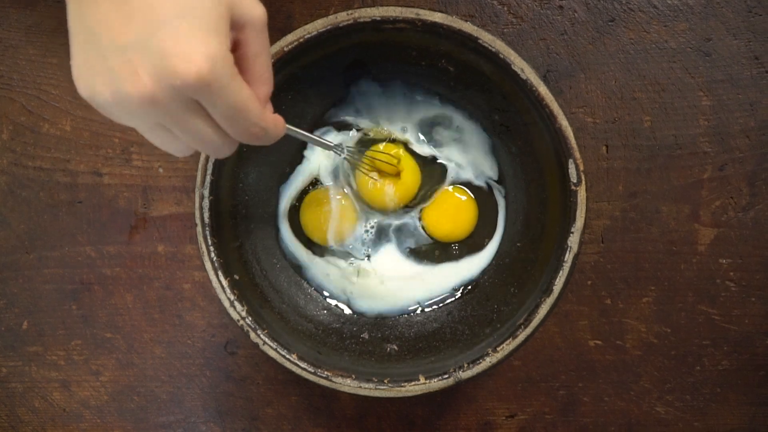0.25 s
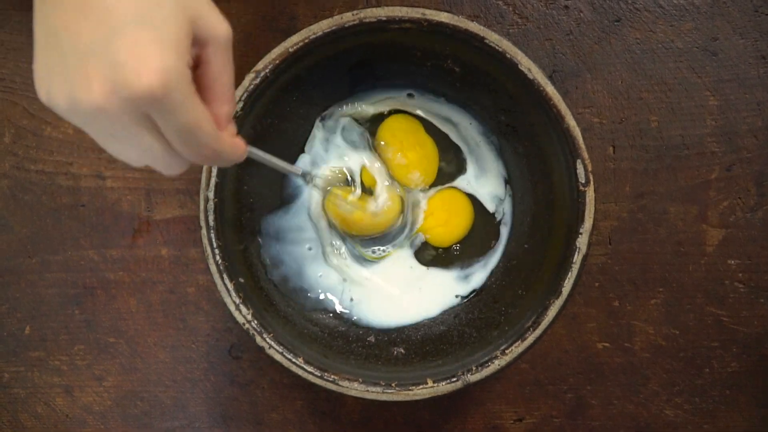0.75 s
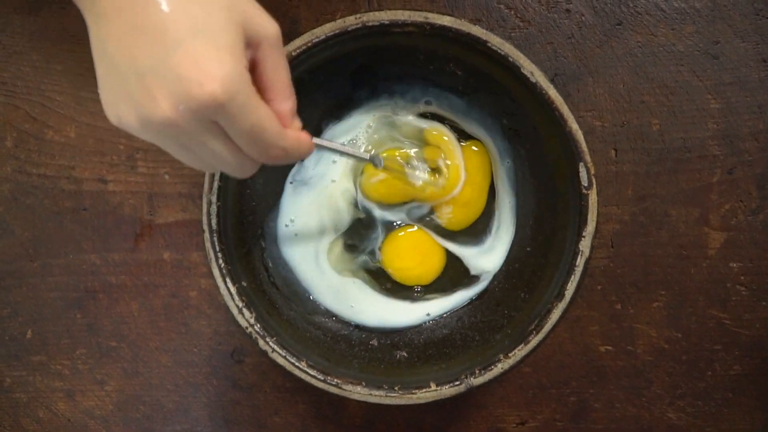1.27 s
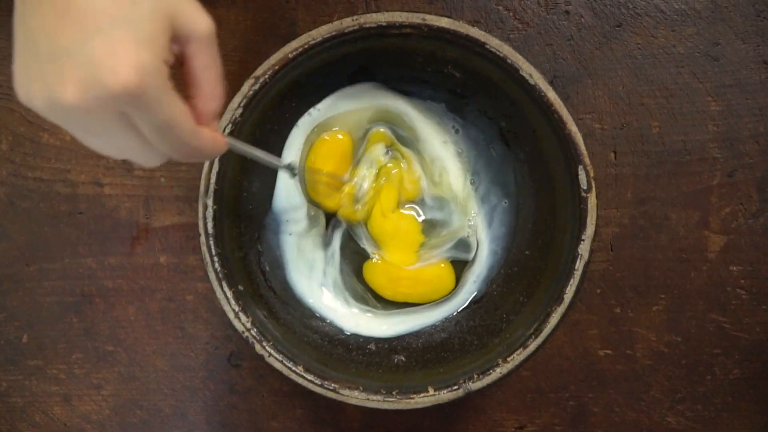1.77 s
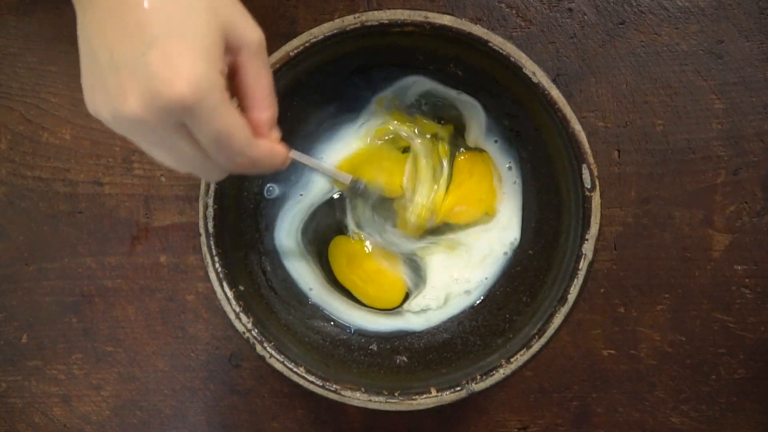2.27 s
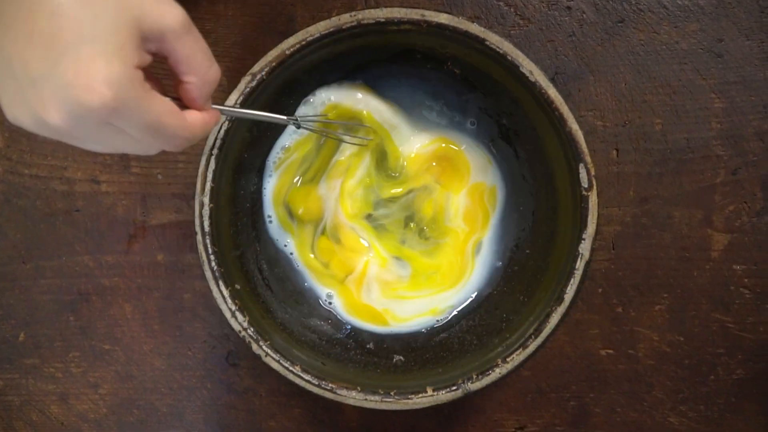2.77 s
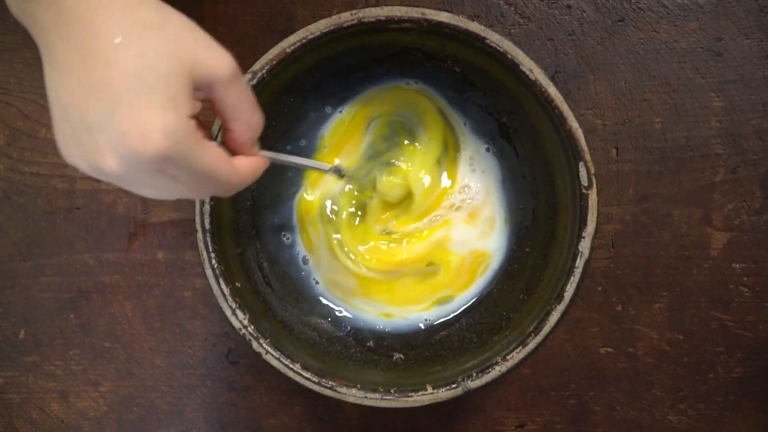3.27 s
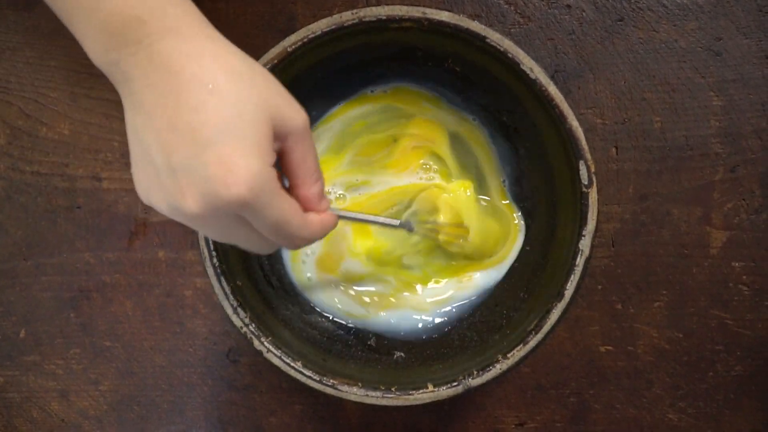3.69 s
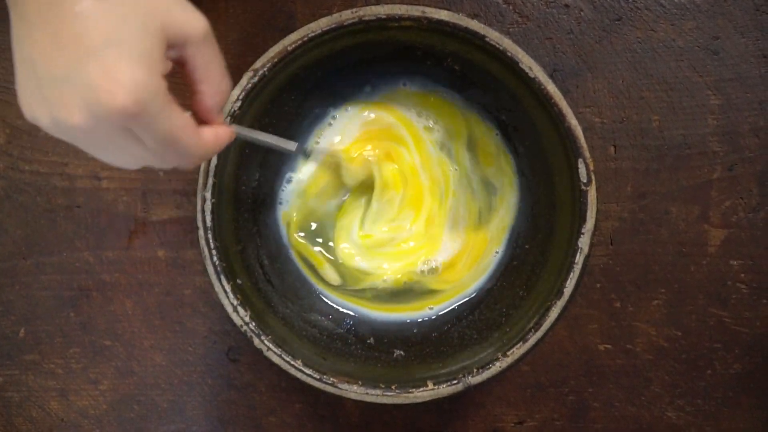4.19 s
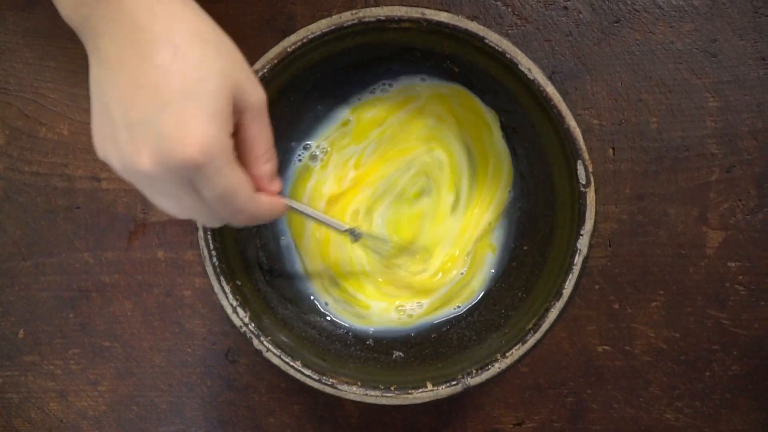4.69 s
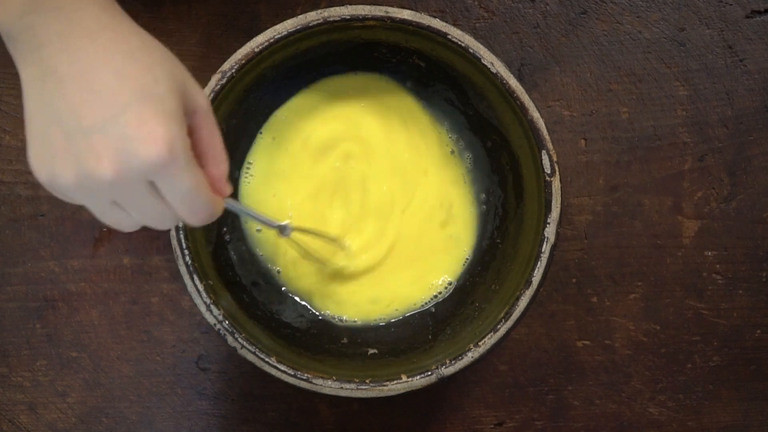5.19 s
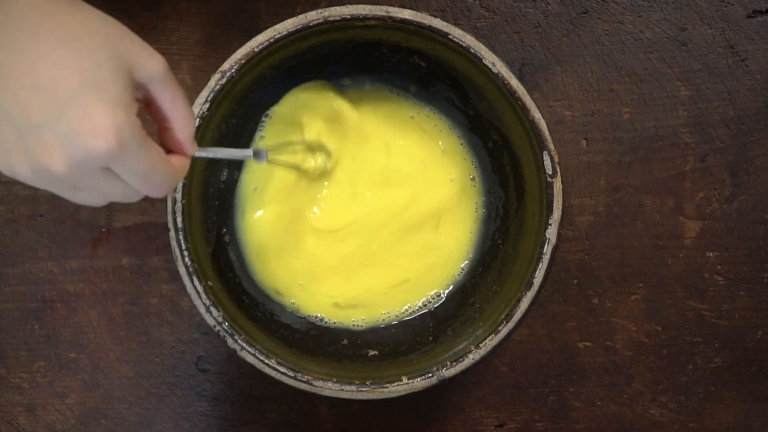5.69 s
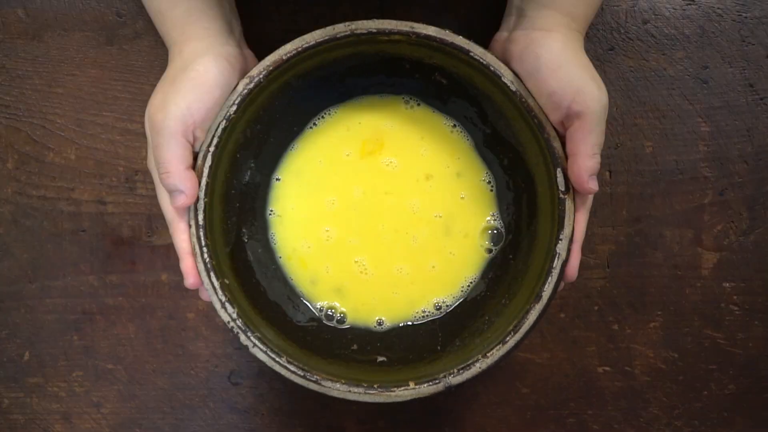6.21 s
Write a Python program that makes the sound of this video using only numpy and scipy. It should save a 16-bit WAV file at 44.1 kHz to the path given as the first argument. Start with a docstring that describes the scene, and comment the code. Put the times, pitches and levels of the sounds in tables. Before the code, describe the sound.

A small wire whisk beats eggs and milk in a ceramic bowl, close to the microphone. From the start, short, bright scrapes come unevenly, about five to seven a second, as the wires skid over the glaze. Each has a thin, quickly fading metallic ring and a damped tone from the bowl. Sharp little ticks fall among them where a wire taps the wall. The strokes are lighter and more spaced at first, then stronger and busier from about 2 seconds, with the sharpest clicks between 3.3 and 4.8 seconds. The egg gives two small wet plops at about 3.8 and 4 seconds. At 4.9 seconds the sound breaks off and goes straight on, duller and deeper in the blended egg, with a few taps and sparser strokes until about 6.1 seconds. The small kitchen adds a brief echo, and a faint, steady low hum runs underneath throughout.

```python
"""In a small kitchen, a wire whisk beats eggs and milk in a ceramic bowl on a wooden table, close by.
On each turn the wires skid over the glaze, and tiny slips ring the wire loops and the egg-damped bowl.
Now and then a wire just taps the wall, or the egg slaps. Near the end the sound breaks off and goes on
duller, with the egg well blended. The room echoes briefly over a low, steady background."""
import sys
import numpy as np
from scipy import signal
from scipy.fft import rfft, irfft
from scipy.io import wavfile

SR = 44100
rng = np.random.default_rng(int(sys.argv[2]) if len(sys.argv) > 2 else 0)


def generate_wav(sig):
    """Save sig (samples, or channels by samples) to the path in sys.argv[1] as 16-bit PCM at SR."""
    pcm = np.round(np.clip(np.atleast_2d(sig).T, -1, 1) * 32767).astype(np.int16)
    wavfile.write(sys.argv[1], SR, pcm)


N = 284438
SIZE = 8192  # samples in one skid, tap or slap
FREQ = np.maximum(np.arange(SIZE // 2 + 1) * SR / SIZE, 1)
TIME = np.arange(SIZE) / SR
BREAK_S = 4.892  # the echo stops dead here; later skids are in blended egg

# The whisk's skids. Each row: start in seconds, length in seconds, hardest point (0-1 of the length),
# strength in dB, then the wires' low ring and high ring in dB above that strength.
SKIDS = [(0.138, 0.061, 0, -35, 4.5, 6), (0.215, .036, 0.38, -30.5, 4, 6),
         (0.265, 0.034, 0.74, -31.5, -0.5, -2.5), (0.413, 0.011, 0, -49.5, 10.5, -8),
         (0.688, 0.087, 0.69, -28, -3.5, -3.5), (0.876, 0.035, 0.46, -30.5, 2.5, -3),
         (1.217, .032, 0.53, -34, 6, -3), (1.567, 0.081, 0.49, -27, 7, 2.5),
         (1.888, 0.016, 0.3, -38.5, -7, -20), (1.932, 0.024, .4, -28.5, -30, -5.5),
         (2.06, 0.041, 0.66, -28.5, -4, 3.5), (2.2065, 0.026, .85, -24, 3, 4.5),
         (2.376, 0.021, 0, -23, 5, -1.5), (2.533, 0.022, 0.45, -23.5, -1, 0.5),
         (2.772, 0.049, 0.18, -29, -0.5, 0.5), (2.934, 0.067, 0.43, -26.5, -12, -3),
         (3.114, 0.092, 0.57, -24, -6.5, 2), (3.312, 0.034, 1, -25, 4.5, 3),
         (3.348, 0.041, 0.17, -32.5, 3, 8.5), (3.485, 0.045, 0.27, -24, 8, 5),
         (3.542, .04, 0.03, -30, -0.5, 2), (3.655, 0.078, 0.55, -31, 0, 2),
         (3.748, 0.023, 0.7, -37.5, -6, -10.5), (3.791, 0.044, 0, -24, -14.5, -4),
         (3.834, 0.055, 0.8, -26.5, 0.5, 9), (3.998, 0.072, .82, -27.5, 5.5, 6),
         (4.211, 0.016, 0.7, -31, -.5, -2), (4.400, .023, .65, -26.5, 5.5, -1),
         (4.582, 0.0083, 0.2, -27.5, 0.5, 10), (4.598, 0.026, 0.86, -26, 3, -2),
         (4.683, .011, 0.7, -37, 3.5, 5.5), (4.791, .048, 0.43, -20.5, 5.5, 2),
         (4.84, 0.051, 0.2, -31.5, 1.5, -1.5), (4.98, .03, .1, -25, -0.5, 2),
         (5.158, 0.021, 0, -30, 5.5, 7), (5.337, 0.031, .5, -30.5, 3, 2), (5.523, 0.034, 0.05, -31, 2, 2.5),
         (5.711, 0.021, 0.3, -37.5, -14.5, -17), (6.053, .028, 0.65, -28.5, 6, -1.5)]
# The pitch wanders with the part of the loop that touches. Each row: time in seconds, low ring in Hz.
WIRE_PITCH = [(0.14, 2697), (0.6, 2613), (1.5, 2618), (2.4, 2563), (3.2, 2630), (3.52, 2718), (4.1, 2604),
              (4.8, 2714), (5.0, 2520), (6.05, 2527)]
# How loud the bowl is under a 0 dB skid. Each row: time in seconds, level in dB.
BOWL_LEVEL = [(0.3, -29.5), (0.7, -19.5), (1.3, -25), (2.3, -20.5), (2.55, -25), (3.8, -18.5), (4.6, -25),
              (5.5, -16), (6.05, -21)]
def skids():
    """Each skid over the glaze rings the bowl and the wires and makes a bright rasp."""
    out = np.zeros(N)
    usual_db, usual_hz = np.mean(SKIDS, axis=0)[3], np.mean(WIRE_PITCH, axis=0)[1]
    for start, length, hardest, db, low_db, high_db in SKIDS:
        # blended egg clings to wires and wall, so the sound is duller and deeper
        upper_bowl_db, bend_lift_db, high_lift_db = (-8, 7.5, -4.5) if start > BREAK_S else (0, 0, 0)
        (low_hz,), (bowl_db,) = read(WIRE_PITCH, start), read(BOWL_LEVEL, start)
        high_hz = 3794 * (low_hz / usual_hz) ** 0.38  # the high ring wanders less
        force = slips(length, hardest * length)
        singing = force * (1 - np.exp(-TIME / 0.001196))  # wires slide a moment before they sing
        bowl = bowl_ring(force, upper_bowl_db)
        bend = loop_bend(force)
        low = sliding(singing, length, 0.016,
                      lambda: wire_ring(low_hz, width_hz=129, split_hz=92, skirt_hz=1200))
        high = sliding(singing, length, 0.018,
                       lambda: wire_ring(high_hz, width_hz=228, split_hz=180, skirt_hz=1500))
        bright = rasp(force, length, top_db=-0.14 + 0.15 * (db - usual_db))  # harder is brighter
        layers = [(bowl, bowl_db + 0.48 * db), (bend, db + low_db - 15.5 + bend_lift_db),
                  (low, db + low_db), (high, db + high_db + high_lift_db), (bright, db)]
        for spectrum, layer_db in layers:
            add(out, start, level(irfft(spectrum), layer_db, length))
    return out


# A quick flick slaps on and off; a long sweep eases in and out. Each row: skid length in seconds,
# then pressure at landing and at lifting in dB, compared with the hardest point.
PRESSURE = [(.028, -3, -5.5), (.048, -13, -12.5)]
def slips(length, hardest_s, per_second=7000, chatter_hz=304.0, release_s=0.0028):
    """The force of a skid: many tiny, unequal slips that swell with the pressure as the wires chatter."""
    land_db, lift_db = read(PRESSURE, length)
    hardest_s = np.clip(hardest_s, length / 20, length * 0.95)
    before = np.clip(1 - TIME / hardest_s, 0, 1)
    after = np.clip((TIME - hardest_s) / (length - hardest_s), 0, 1)
    pressure = undb(land_db * before ** 2 + lift_db * after ** 2)
    contact = np.exp(-np.maximum(TIME - length, 0) / release_s)
    chatter = np.interp(TIME * chatter_hz, np.arange(SIZE), rng.standard_normal(SIZE))
    kicks = (rng.random(SIZE) < per_second / SR) * rng.choice([-1, 1], SIZE)
    sizes = undb(2.5 * np.minimum(rng.exponential(size=SIZE), 4))
    knock = 1 + undb(9) * np.exp(-TIME / 0.0012)  # the wire lands with a knock
    return kicks * sizes * undb(1.5 * chatter) * pressure * contact * knock


def sliding(force, length, shift_s, body):
    """The contact slides along the wire, so every shift_s one shade of its tone fades into the next."""
    place = np.minimum(TIME, length) / shift_s
    shares = (np.cos(np.pi / 2 * np.minimum(np.abs(place - k), 1)) for k in range(int(place[-1]) + 2))
    return sum(rfft(force * share) * body() for share in shares)


def wire_ring(hz, width_hz, split_hz, skirt_hz):
    """The whisk's loops are nearly alike, so they ring as a cluster of close tones."""
    cluster = [(hz - split_hz, width_hz, -4), (hz, width_hz, 0), (hz + split_hz, width_hz, -4)]
    return modes(cluster, scatter_db=4.5, detune=0.011) * resonance(FREQ, hz, skirt_hz)


# The filled bowl's tones. Each row: pitch in Hz, width in Hz (wider dies sooner), relative level in dB.
BOWL_TONES = [(333.6, 61, -3.5), (368.7, 48, 0.5), (439, 39, -4), (540, 43, -5), (590.7, 36.3, 0.5),
              (727, 174, -8.5), (831, 254, -13), (1080, 88, -5), (1187, 89, -3.5), (1263, 85, -6.5)]
def bowl_ring(force, upper_db):
    """The slips shake the bowl and the egg damps it; upper_db turns its higher tones down."""
    ringing = modes(BOWL_TONES, scatter_db=2.0, detune=0.013) * resonance(FREQ, 616, 1400)
    upper = np.clip(np.log2(FREQ / 420), 0, 1)
    return rfft(force) * ringing * causal(undb(upper_db * upper))


# The tones of the bending loops. Each row: pitch in Hz, width in Hz, relative level in dB.
LOOP_TONES = [(1830, 92, -1), (1950, 93, -1), (2163, 110, -5.5)]
def loop_bend(force):
    """The wire loops bend and sound a little below their low ring."""
    return rfft(force) * modes(LOOP_TONES, scatter_db=0, detune=0.025) * resonance(FREQ, 1967, 460)


# The tone of steel on glaze, for skids and taps. Each row: frequency in Hz, relative level in dB.
RASP_COLOUR = [(200, -34.5), (500, -4), (1500, -10.5), (2200, -8.5), (3200, -5), (4500, -0.5), (5500, -1),
               (8000, 0), (9700, -3), (12000, -5), (14000, -8), (16000, -13)]
def rasp(force, length, top_db):
    """Sliding steel hisses on the glaze; top_db lifts or lowers the highest treble."""
    scraping = sliding(force, length, 0.018, lambda: steel(overtone_db=-1.5, echo_db=-1.5))
    top = np.clip(np.log2(FREQ / 7500) * 2, 0, 1)
    return scraping * causal(colour(FREQ, RASP_COLOUR)) * causal(undb(top_db * top))


# The wires' overtones. Each row: pitch in Hz, width in Hz, relative level in dB.
WIRE_OVERTONES = [(4990, 130, -13.5), (5485, 425, 10), (6423, 470, 5.5), (7740, 183, 10.5),
                  (8380, 136, 5.5), (8790, 380, 10), (10800, 290, 1.5), (11050, 87, 11), (12470, 330, 1.5),
                  (14000, 490, -12.5)]
def steel(overtone_db, echo_db):
    """Each point of contact favours some overtones, and the bowl's wall echoes it from close by."""
    ringing = modes(WIRE_OVERTONES, scatter_db=4, detune=0.009)
    delay_s = rng.uniform(0.0002, 0.0009)
    echo = np.exp(-2j * np.pi * FREQ * delay_s)
    return (1 + undb(overtone_db) * ringing) * (1 + undb(echo_db) * echo)


# Single taps: light ones tend to ring an overtone, hard ones the low ring. Each row: start in seconds,
# peak of the tick in dB, strength of the ring in dB above that, pitch of the ring in Hz.
WIRE_TAPS = [(0.213, -16, -12, 2600), (0.6905, -17, -18, 2605), (1.277, -26, -1, 5830),
             (1.510, -29.5, -4, 5000), (1.9024, -22, 5.5, 2470), (2.043, -31, 1, 6500),
             (2.4853, -24, -2, 6400), (2.926, -20.5, -7.5, 2580), (3.1031, -20.5, -7, 2600),
             (3.2884, -12.5, 3, 2700), (3.354, -16, -16, 2680), (3.4701, -10, -1.5, 2780),
             (3.7658, -21, -5.5, 8200), (4.399, -14.5, -12, 2550), (4.5833, -9, -2.5, 2710),
             (4.7714, -10.5, -2.5, 2750), (4.9446, -21, -7, 3020), (5.0232, -24.5, 10, 2615),
             (5.0434, -15.5, 6, 3010), (5.8675, -34, 0.5, 3510)]
def taps():
    """A wire hits the wall with a bright snap, bounces straight off, then grazes on lightly."""
    out, glaze = np.zeros(N), causal(colour(FREQ, RASP_COLOUR))
    snap = undb(7.5) * resonance(FREQ, 3760, 261)
    for start, db, ring_db, hz in WIRE_TAPS:
        hit, graze = np.exp(-TIME / 0.00028), undb(-18.5) * np.exp(-TIME / 0.0082)
        force = rng.standard_normal(SIZE) * (hit + graze)
        tick = irfft(rfft(force) * glaze * (steel(overtone_db=-12.5, echo_db=-9) + snap))
        ring = np.sin(2 * np.pi * hz * TIME) * (1 - np.exp(-TIME / 0.00046)) * np.exp(-TIME / 0.0026)
        add(out, start, undb(db) * (tick / np.abs(tick).max() + undb(ring_db) * ring))
    return out


# Slaps of egg. Each row: start in seconds, strength in dB, pitch of the air pocket in Hz.
EGG_SLAPS = [(3.796, -18, 588), (4.018, -22.5, 367)]
def slaps():
    """A wave of egg splashes back behind the whisk and traps a pocket of air, which plops."""
    out, swell = np.zeros(N), 1 - np.exp(-TIME / 0.0016)
    for start, db, hz in EGG_SLAPS:
        plop = np.sin(2 * np.pi * hz * TIME) * swell * np.exp(-TIME / 0.013)
        burst = rng.standard_normal(SIZE) * swell * np.exp(-TIME / 0.0069)
        splash = irfft(rfft(burst) * resonance(FREQ, 1540, 1100) ** 2)
        add(out, start, undb(db) * (plop + undb(-3.5) * splash / np.abs(splash).max()))
    return out


# The room's echo. Each row: middle of a band in Hz, seconds to fade by 60 dB, gain in dB.
ECHO_BANDS = [(350, 0.36, -13), (700, 0.15, -8.5), (1435, 0.35, -11), (2780, 0.24, -17),
              (4558, 0.19, -15.5), (7670, 0.24, -17), (13000, 0.18, -25.5)]
def kitchen_echo(x, first_echo_s=0.012):
    """The small room answers with a short wash of sound; each band fades at its own speed."""
    t = np.arange(SR // 2) / SR
    freq = np.maximum(np.arange(len(t) // 2 + 1) * SR / len(t), 1)
    centres = np.log([row[0] for row in ECHO_BANDS])
    noise, response = rfft(rng.standard_normal(len(t))), 0
    for share, (_, fade_s, db) in zip(np.eye(len(ECHO_BANDS)), ECHO_BANDS):
        fade = undb(-60 * t / fade_s) * (t > first_echo_s)
        band = irfft(noise * np.interp(np.log(freq), centres, share), len(t))
        response = response + undb(db) * band * fade / np.sqrt(np.sum(fade ** 2))
    return signal.fftconvolve(x, response)[:N]


# The kitchen's steady noise. Each row: frequency in Hz, relative level in dB.
ROOM_NOISE = [(12, -52), (20, -7.5), (53, -4.5), (88, -19.5), (187, -17), (210, -22), (234, -8.5),
              (377, -16.5), (434, -20), (499, -8), (780, -16.5), (897, -15), (1440, -22), (1910, -26.5),
              (16000, -34)]
# Low drones. Each row: pitch in Hz, rough width in Hz, level in dB.
ROOM_DRONES = [(48.9, 7.7, -63.5), (64.4, 5.9, -73), (190.8, 9.2, -65), (248.4, 9.1, -68),
               (363, 31.6, -59.5), (588, 49, -58.5), (767.6, 19.6, -60)]
def background(noise_db=-50, side_db=-64.5):
    """Steady rumble, hiss and drones; left and right differ mainly in the deepest part."""
    freq = np.maximum(np.arange(N // 2 + 1) * SR / N, 1)
    def noise(gain, db):
        return level(irfft(rfft(rng.standard_normal(N)) * gain, N), db, N / SR)
    thin_bottom = colour(freq, [(20, -8), (32, -2), (45, -0.5)])
    middle = noise(colour(freq, ROOM_NOISE) * thin_bottom, noise_db)
    for hz, width, db in ROOM_DRONES:
        middle += noise(resonance(freq, hz, 2 * width) ** 2, db)
    side_colour = [(20, -9), (60, -0.5), (110, -6), (300, -14), (2000, -25.5), (15000, -19)]
    side = noise(colour(freq, side_colour), side_db)
    return np.array([middle + side, middle - side])


def undb(db):
    """Turn decibels into a gain."""
    return 10 ** (np.asarray(db) / 20)


def level(x, db, seconds):
    """Scale x so that its energy, spread over that many seconds, has this average level."""
    return x * undb(db) / np.sqrt(np.sum(x ** 2) / (seconds * SR))


def add(track, start, x):
    """Mix x into the track at a time in seconds."""
    i = int(start * SR)
    track[i:i + len(x)] += x[:len(track) - i]


def read(table, at):
    """Read a table between its rows, joining them with straight lines."""
    first, *others = np.transpose(table)
    return [np.interp(at, first, column) for column in others]


def resonance(freq, hz, width):
    """A filter that rings at one pitch, with gain 1 there."""
    return 1 / (1 + 1j * (freq ** 2 - hz ** 2) / (freq * width))


def modes(table, scatter_db, detune):
    """A filter that rings at several pitches; each contact shifts their levels and tuning a little."""
    chance = rng.standard_normal((len(table), 2))
    return sum((-1) ** k * undb(db + scatter_db * louder) * resonance(FREQ, hz * (1 + detune * up), width)
               for k, ((hz, width, db), (louder, up)) in enumerate(zip(table, chance)))


def colour(freq, points):
    """A gain curve through (Hz, dB) points."""
    hz, db = np.transpose(points)
    return undb(np.interp(np.log(freq), np.log(hz), db))


def causal(gain):
    """The filter with this gain curve that starts as sharply as it can."""
    cepstrum = irfft(np.log(gain))
    cepstrum[1:SIZE // 2] *= 2
    cepstrum[SIZE // 2 + 1:] = 0
    return np.exp(rfft(cepstrum))


def scene():
    """The whisk in the middle, with the room around it; no echo carries across the break."""
    whisk = skids() + taps() + slaps()
    later = np.arange(N) / SR > BREAK_S
    echo = sum(kitchen_echo(whisk * part) * part for part in (~later, later))
    return whisk + echo + background()


def record(dry):
    """Cut the treble above 15800 Hz."""
    return signal.sosfilt(signal.ellip(10, 0.2, 70, 15800, fs=SR, output="sos"), dry)


dry = scene()
out = record(dry)
generate_wav(out)
```